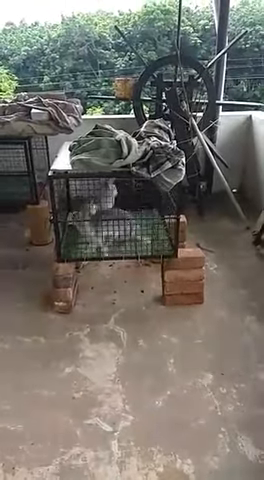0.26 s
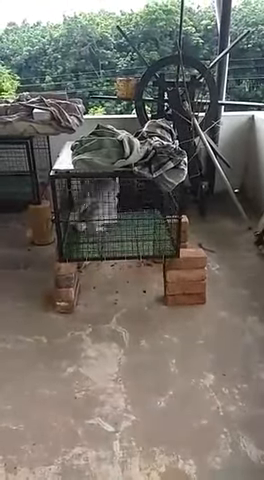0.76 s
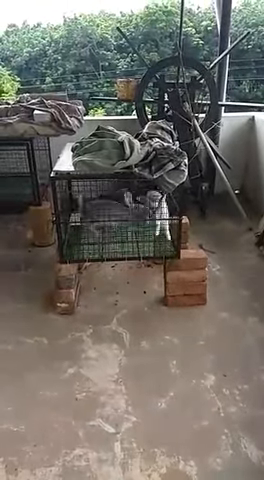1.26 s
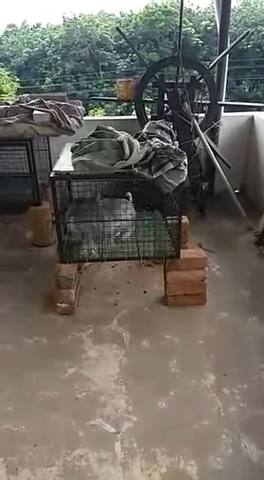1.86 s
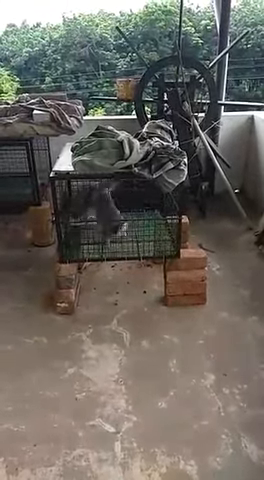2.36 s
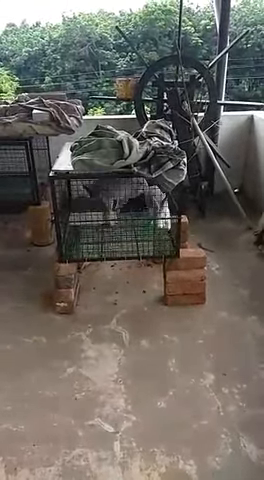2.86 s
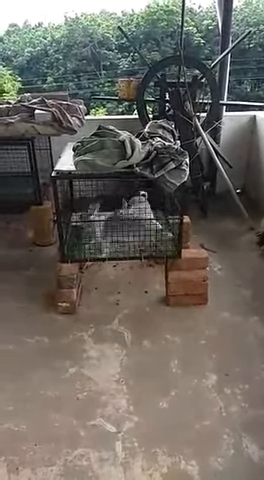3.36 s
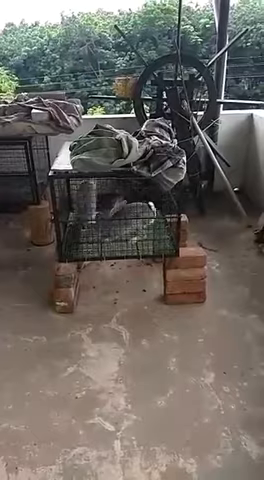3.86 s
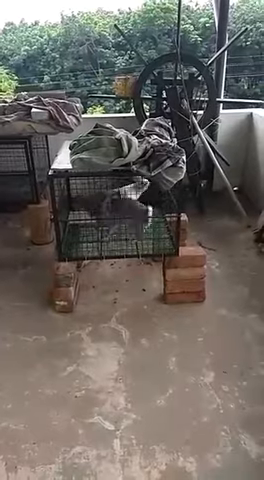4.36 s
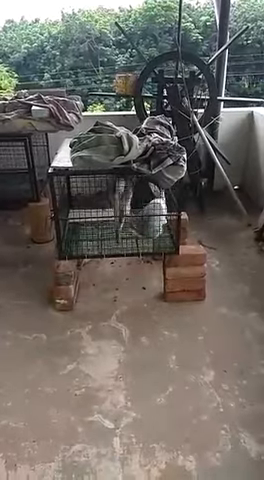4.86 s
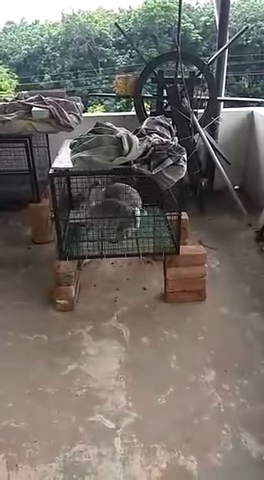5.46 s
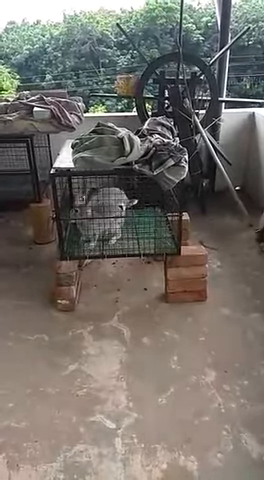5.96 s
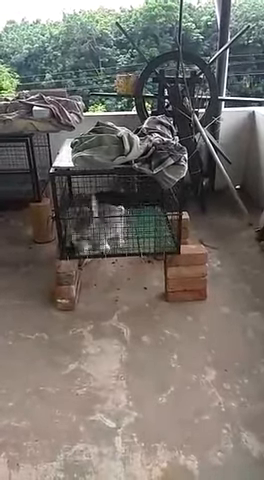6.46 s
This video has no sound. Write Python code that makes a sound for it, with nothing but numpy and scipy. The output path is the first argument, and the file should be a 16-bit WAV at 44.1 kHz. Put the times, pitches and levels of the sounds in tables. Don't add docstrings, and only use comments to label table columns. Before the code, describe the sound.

A covered concrete terrace, heard by a phone a few metres from a wire cage where two rabbits scuffle. A low distant engine drone, strongest at the start, recedes under steady airy outdoor hiss. Restless paws scrabble and jingle the thin mesh. Rattling builds from 0.7 s to a sharp ringing clank at 0.9 s with a low thud. Smaller rattles and tray bumps come at 1.1-1.6 s and around 2.0 s. Chatter resumes at 2.6 s, then the loudest crash hits at 2.75 s, bright rods ringing over a booming metal floor, rebounding at 3.0 s. Light rattles follow at 3.3 and 3.6 s, then a lull, a soft clatter at 4.0 and 4.4 s, and a cluster of clanks at 4.5-4.8 s. Thin wire ticks and short rattles continue to 5.2 s. It is nearly quiet until 6.2 s, when light rattling returns to the end, 6.7 s. Echoes are short and hard.

```python
import sys
import numpy as np
from scipy import signal
from scipy.fft import rfft, irfft, next_fast_len
from scipy.io import wavfile
from scipy.ndimage import uniform_filter1d

SR = 44100
rng = np.random.default_rng(int(sys.argv[2]) if len(sys.argv) > 2 else 0)


def store_wav(level_fs):
    pcm = np.round(np.clip(np.atleast_2d(level_fs), -1, 1) * 32767)
    wavfile.write(sys.argv[1], SR, pcm.T.astype(np.int16))


def boost(x):
    u = np.asarray(x, float) / 20
    return 10 ** u


N = 295468


def evened(x):
    return x / np.sqrt(np.mean(x ** 2) + 1e-20)


def db_of(power):
    return 10 * np.log10(np.abs(power) + 1e-20)


def read(points, hz):
    f, value = np.transpose(points)
    return np.interp(np.log(hz + 1), np.log(f + 1), value)


def curve(points):
    return np.interp(np.arange(N) / SR, *np.transpose(points))


# t/s, level/dB
PAW_EFFORT = [(0, -30), (.15, -31), (.6, -33), (.8, -36.5), (1.16, -31.5), (1.44, -36), (1.9, -35.5),
              (2.45, -32.5), (2.6, -41.5), (2.9, -25.5), (3.15, -34.5), (3.45, -50), (3.9, -42.5),
              (4.3, -46), (4.75, -37), (5.3, -51.5), (5.9, -47), (6.2, -48), (6.7, -48)]


def paw_effort():
    return curve(PAW_EFFORT)


def effort_swing():
    effort = paw_effort()
    return effort - effort.mean()


# t/s, level/dB
ENGINE_NEARNESS = [(0, -35), (.3, -38.5), (.6, -44.5), (1.3, -45.5), (2.0, -42), (3.0, -46.5), (4.0, -48),
                   (5.2, -47), (6.7, -50)]


def engine_nearness():
    return curve(ENGINE_NEARNESS)


# f/Hz, level/dB per Hz
AIR_COLOUR = [(15, -53), (25, 2), (96, -31), (147, -3), (244, -8.5), (278, -4.5), (353, -5.5), (599, -13.5),
              (684, -10), (2310, -14), (8930, -13), (11500, -19), (13000, -21), (14000, -50)]
# f/Hz, likeness (1 = the same)
AIR_LIKENESS = [(30, 0.99), (70, 0.75), (280, 0.87), (700, 0.3), (1500, 0.035), (4000, 0.017),
                (13000, 0.053)]


def wash():
    frames, hz = N // 256 + 5, np.fft.rfftfreq(1024, 1 / SR)
    a, b, c, d, patches = rng.standard_normal((frames, 513, 5)).T
    patches = evened(uniform_filter1d(uniform_filter1d(patches, 10, 0), 6, 1))
    gusts = evened(patches[60:].mean(0)) * (hz > 2000)[:, None]
    same = np.clip(read(AIR_LIKENESS, hz), -1, 1)[:, None]
    left = a + 1j * b
    right = same * left + np.sqrt(1 - same ** 2) * (c + 1j * d)
    level_db = read(AIR_COLOUR, hz)[:, None] + 2.1 * patches + 2.12 * gusts
    spectra = np.array([left, right]) * boost(level_db)
    air = evened(signal.istft(spectra, nperseg=1024, noverlap=768)[1][:, :N])
    near = engine_nearness()
    loudness_db = -43.5 + 0.13 * effort_swing() + 0.13 * (near - near.mean())
    return boost(6.5 + loudness_db) * air


# t/s, f/Hz of its cycle
ENGINE_SPEED = [(0, 20.7), (1.5, 20.1), (3, 19.7), (5, 19.3), (6.7, 19.2)]
# multiple of the cycle, level/dB
ENGINE_TONES = [(5, -18), (6, -13), (7, 0.5), (8, 0), (9, -21), (10, -4.5), (11, -8), (14, -11.5),
                (15, -26), (17, -16), (19, -10.5), (24, -19.5)]


def hum():
    turns = np.cumsum(curve(ENGINE_SPEED)) / SR
    now, steps = np.arange(N), np.linspace(0, N, 40)
    out = np.zeros(N)
    for order, db in ENGINE_TONES:
        swell_db, slip = rng.standard_normal((2, len(steps)))
        drift = np.interp(now, steps, 0.067 * np.cumsum(slip))
        phase = round(order) * turns + drift
        out += boost(db + np.interp(now, steps, 2.9 * swell_db)) * np.sin(2 * np.pi * phase)
    loudness = uniform_filter1d(boost(2 + engine_nearness()), size=9000)
    return boost(-2.0) * loudness * evened(out)


# f/Hz, time to fall 60 dB t/s
TERRACE_ECHO = [(200, 0.1), (1000, 0.22), (4000, 0.25), (12000, 0.23)]


def terrace(x):
    taps = np.zeros((2, SR))
    at = np.arange(200, SR - 20, 20) + rng.integers(0, 20, (2, (SR - 201) // 20))
    np.put_along_axis(taps, at, rng.choice([-1., 1.], at.shape), 1)
    hz, t, z = signal.stft(taps, SR, nperseg=256)
    fade = boost(-60 * t / read(TERRACE_ECHO, hz)[:, None])
    tail = signal.istft(z * fade, SR, nperseg=256)[1]
    return signal.fftconvolve(x, tail / np.linalg.norm(tail[0]), axes=1)[:, :N]


# t/s, level/dB, f/Hz
CAGE_THUDS = [(.9, -29.5, 155), (1.49, -33.5, 170), (2.76, -29.5, 165.7), (2.92, -31, 149.6),
              (2.93, -33.5, 273), (4.1, -37, 386), (4.721, -32.5, 140.7), (4.73, -37.5, 275),
              (6.5, -37.5, 170.7), (4.25, -40.5, 385), (6.3, -40, 384), (6.45, -41, 380)]


def thuds():
    rise_s, t60_s, spread = 0.048, 0.42, 0.06
    out, t = np.zeros(N + SR), np.arange(SR // 2) / SR
    chance = rng.standard_normal((len(CAGE_THUDS), 2, 6, 1))
    for (s, db, hz), (off, phase) in zip(CAGE_THUDS, chance):
        modes = evened(np.sin(2 * np.pi * (hz * (1 + spread * off) * t + phase)).sum(0))
        fade = boost(db - 60 * t / t60_s) * np.minimum(t / rise_s, 1)
        out[round(s * SR):][:len(t)] += fade * modes
    return out[:N]


def ring(modes, longest):
    hz, db, t60 = np.transpose(modes)[:, :, None]
    t = np.arange(round(longest * SR)) / SR
    fade = boost(db - 60 * t / np.clip(t60, .01, longest))
    body = (fade * np.sin(2 * np.pi * hz * t)).sum(0)
    return body / np.linalg.norm(body)


def contacts(per_s, spread_db):
    size = boost(spread_db * np.minimum(rng.exponential(1, N), 4)) * rng.choice([-1, 1], N)
    return evened(size * (rng.random(N) < per_s / SR))


def shaking(kicks, rise_s):
    out, t = np.zeros((2, N + SR)), np.arange(SR // 4) / SR
    for s, db, pan_db, length in kicks:
        fade = np.exp(-t / max(length, .002)) * np.minimum(t / rise_s, 1)
        sides = boost(db + pan_db * np.array([[.5], [-.5]]))
        out[:, round(s * SR):][:, :len(t)] += (sides * fade) ** 2
    return np.sqrt(out[:, :N])


# t/s, level/dB
FOOT_LANDINGS = [(.455, -32), (.848, -25), (.8994, -33), (1.315, -27), (1.496, -21.5), (2.063, -24.5),
                 (2.7006, -39), (2.757, -12.5), (2.826, -28), (2.914, -22.5), (3.011, -35), (3.054, -24),
                 (3.2859, -33), (4.7176, -23), (4.825, -27), (5.178, -32), (5.59, -40), (6.283, -24.5),
                 (6.54, -34)]
# f/Hz, level/dB, time to fall 60 dB t/s
TRAY_MODES = [(200, -46, .12), (273, -49, .12), (326.5, 0.5, 0.26), (624, -12, 0.43), (800, -20, 0.074),
              (1018, 1, 0.17), (1220, -14, 0.52), (1795, 15, 0.023)]


def tray():
    landings = [(s, db, 0, 0.017) for s, db in FOOT_LANDINGS]
    drive = boost(-10.5) * shaking(landings, rise_s=.003).mean(0) * contacts(1600, 1.4)
    return signal.oaconvolve(drive, ring(TRAY_MODES, 0.44))[:N]


# t/s, mesh level/dB, left-right level/dB, chatter length t/s
PAW_RAKES = [(0.172, -33, -14, 0.014), (0.8, -15, 2, 0.03), (0.843, -21.5, -10, 0.014),
             (1.138, -25, 6, 0.017), (1.312, -23.5, -2, 0.011), (1.413, -29, 9, .019),
             (1.546, -30.5, -7, 0.022), (1.644, -43, 0, .025), (1.994, -28, -5, 0.05), (2.28, -44, 0, .027),
             (2.644, -23.5, -1.5, 0.058), (2.856, -26, -1, .04), (2.968, -24, 12, 0.017),
             (3.093, -34, -3, 0.036), (3.281, -23.5, 0.5, 0.022), (3.37, -33, 3, 0.03),
             (3.564, -25, 2, 0.015), (3.627, -29.5, 1, 0.031), (4.452, -33, -1, 0.01),
             (4.534, -26.5, 2.5, 0.044), (4.82, -22.5, 1, 0.013), (4.932, -34.5, 12, 0.023),
             (4.96, -39, 7, .028), (4.991, -26.5, 1, 0.011), (5.08, -33, -1, 0.029),
             (5.182, -25.5, 1, 0.013), (6.234, -25.5, 2.5, 0.023), (6.282, -25, -1, 0.012),
             (6.429, -33, 3.5, 0.028), (6.478, -28, -1.5, 0.053), (6.662, -28, 2, 0.046)]


def rakes(frame_db=0):
    return [(s, db + frame_db, pan, length) for s, db, pan, length in PAW_RAKES]


# t/s, mesh level/dB, frame over mesh level/dB, left-right level/dB
BODY_SLAMS = [(.455, -40, -12, -11), (.721, -29, -11, 8), (.838, -22.5, -4, -2), (.878, -30, 5, 0),
              (0.888, -21, 0.5, 13), (0.895, -12, -12, -1), (0.931, -21, 1.5, -1), (0.955, -22.5, 4, -1),
              (.975, -24, 2, 1), (.992, -25.5, 1, 3), (1.096, -30, 1, 2), (1.497, -25.5, -5.5, 8.5),
              (1.972, -20, -4.5, 1), (2.063, -38.5, 11, -1), (2.445, -51.5, 1, -5),
              (2.598, -22.5, -6, -0.5), (2.616, -20.5, -14, -0.5), (2.6989, -20, 2, 0.5),
              (2.7479, -7, 1.5, -6.5), (2.765, -23, 4, 1), (2.815, -14.5, 1.5, 2), (2.914, -17.5, -8, -2),
              (3.008, -16, -6, 3), (3.053, -24.5, 0, 1), (3.976, -29, -3, -1), (3.988, -22.5, -5, 0),
              (4.379, -26.5, -5.5, 1), (4.398, -31, -2.5, -2), (4.733, -27.5, -5, -8),
              (4.581, -26.5, -11, -2), (4.639, -19.5, -8, 0.5), (4.718, -19, -5, 2.5),
              (6.246, -32, -10, -1), (6.607, -29.5, -20, 5)]


def slams(on_frame):
    return [(s, db + on_frame * frame_db, pan, 0.016 * boost(-0.1329 * (db + 34.5)))
            for s, db, frame_db, pan in BODY_SLAMS]


def wires(colour, t60, count):
    hz = rng.uniform(1475, 13500, count)
    db = read(colour, hz) + 4 * rng.standard_normal(count)
    return ring(np.c_[hz, db, t60 * rng.uniform(.5, 1.5, count)], .1)


# f/Hz, level/dB
FREE_MESH = [(880, -37), (1500, -22), (1900, 0), (2500, 6.5), (2970, 2.5), (3540, -10), (4080, -10),
             (4440, 1.5), (12500, 12.5), (13400, 6.5), (14000, -57)]
# f/Hz, level/dB
BRACED_MESH = [(880, -37), (1500, -22), (2000, -15), (2900, 2), (3200, -24), (3550, 10.5), (4000, -25),
               (4400, 1), (6700, 3), (7100, -17), (7900, 10.5), (10000, 8), (11500, 3), (13400, 4),
               (14000, -57)]


def mesh():
    raking = boost(-3.0) * shaking(rakes(), rise_s=.006) * contacts(2500, 4.1)
    scrabble = boost(-8.5) * boost(-2 + paw_effort()) * contacts(3000, 8.5)
    light = raking + scrabble
    heavy = boost(-3.0) * shaking(slams(on_frame=False), rise_s=.003) * contacts(2500, 4.1)
    place = np.cumsum(np.abs(uniform_filter1d(rng.standard_normal(N), 2000))) * 400 / SR
    patch = place.astype(int) % 4
    out = np.zeros((2, N))
    for k in range(4):
        for drive, colour, t60 in ((light, FREE_MESH, .035), (heavy, BRACED_MESH, .05)):
            patch_ring = wires(colour, t60, count=240)[None]
            out += signal.oaconvolve(drive * (patch == k), patch_ring, axes=1)[:, :N]
    return out


THICK_ROD_HZ = [1245, 1779, 2327, 2592, 2676, 2925, 2986, 3460, 3574, 4357, 4391, 4735, 5500, 1980]
THIN_ROD_HZ = [6029, 6183, 6432, 6730, 7849, 8146, 8473, 8683, 9215, 9690, 9943, 10800, 11180, 11540]
# time to fall 60 dB t/s, then level/dB in
RODS = [(0.24, -11, -31, -31, -42), (.12, -14, -31, -33, -40), (0.18, 2.5, -26, -33, -38),
        (0.14, 2, -33, -32, -40), (0.13, 5, -31, -26, -35), (0.16, 1, -30, -26, -38),
        (.15, -1, -31, -32, -40), (0.065, -12, -46, -38, -48), (0.14, 2, -29, -20, -24.5),
        (0.2, 3.5, -23.5, -31, -41), (0.17, -1, -32, -34, -36), (0.1, -0.5, -30, -24, -27),
        (0.13, 2.5, -33, -20.5, -32), (.12, 1, -32, -36, -44),
        (.12, -3, -36, -32, -33), (.1, -6, -30, -32, -42), (0.12, -7, -36, -28, -38),
             (.08, 2.5, -26, -32, -39), (0.18, 2, -37, -32, -35), (0.26, 2, -34, -27, -38),
             (0.16, 6.5, -36, -30, -38), (0.11, 2, -36, -27, -40), (.16, 0.5, -32, -26, -34),
             (.15, -7, -34, -32, -38), (0.16, -3, -38, -34, -35), (.15, -4, -35, -21, -40),
             (0.11, -6, -38, -25, -40), (0.087, -6, -36, -27, -40)]


def rod_ring(column, longest):
    table = np.array(RODS)
    db = table[:, column]
    return ring(np.c_[THICK_ROD_HZ + THIN_ROD_HZ, db, table[:, 0]], longest), db


def frame():
    hz = rng.uniform(1787, 7118, 90)
    welds = ring(np.c_[hz, 4 * rng.standard_normal(90), np.full(90, .04)], 1 / 4)
    rods, _ = rod_ring(column=1, longest=1 / 4)
    kicks = slams(on_frame=True) + rakes(frame_db=-17)
    clank = boost(-5) * shaking(kicks, rise_s=.003) * contacts(1800, 0.79)
    stirring = boost(-42 + 1.02 * effort_swing())
    jingle = boost(-6.5) * stirring * contacts(2500, 5.3)
    clank = signal.oaconvolve(clank, (rods + welds)[None], axes=1)[:, :N]
    return clank + signal.oaconvolve(jingle, welds + boost(-18.5) * rods)[:N]


# t/s,
# level/dB, f/Hz
BRIEF_TICKS = [(.19, -28, 10900), (.905, -6, 5500), (.912, -11.5, 4500), (.914, -13, 5500),
               (.806, -14, 11500), (.894, -5, 2610), (.899, -3, 2890), (.9, -6, 5500), (.907, -11, 2630),
               (.9, -10, 9800), (1.327, -14, 9600), (1.546, -15, 10800), (1.655, -19, 12000),
               (3.575, -20, 10700), (2.7495, -1, 8940), (2.757, -3, 9500), (2.762, 0, 8560),
               (2.772, -9, 7450), (2.778, -3.5, 5000), (3.012, -11, 5330), (3.02, -14, 9500),
               (4.379, -14, 8750), (4.519, -17, 11260), (4.588, -19, 11700), (4.689, -15, 11500),
               (4.7195, -19, 9320), (4.7195, -13, 12700), (4.726, -19, 12200), (4.729, -23, 9100),
               (4.7345, -20, 10200), (4.964, -8, 10600), (5.002, -16, 10830), (5.086, -17, 12000),
               (5.187, -13.5, 11260), (5.198, -13, 11400), (5.6, -31, 11000), (5.87, -33, 10600),
               (6.24, -26, 10200), (6.44, -28, 10000), (6.256, -16, 11600), (6.285, -15, 11340),
               (6.497, -32, 11100), (6.546, -26, 11500), (6.62, -18, 12000), (2.746, -11, 7300),
               (2.7495, -6, 5500), (2.753, -4, 3550), (2.767, -2, 9280), (2.812, -9, 8000),
               (2.824, -11, 8030), (2.833, -11, 8170), (3.011, -15, 9600), (3.011, -17, 12500),
               (3.028, -16, 8000), (3.028, -20, 5500), (4.831, -16, 8600), (4.842, -22, 8850)]


def ticks():
    return [(s, db, hz, 0.02, .13) for s, db, hz in BRIEF_TICKS]


# t/s, level/dB, f/Hz, spread of close tones as a share
ROD_KNOCKS = [(.682, -29.5, 930, 0.021), (.834, -21, 341, 0.031), (0.93, -27, 986, 0.002),
              (1.2, -31, 344, 0.077), (1.49, -25.5, 738, 0.09), (2.716, -11, 5300, 0.069),
              (2.93, -23, 677, 0.083), (3.012, -10.5, 5500, 0.059), (3.012, -14.5, 2900, 0.106),
              (4.72, -18, 4600, .05), (4.724, -19, 2200, 0.053), (4.729, -21, 3400, .05),
              (4.734, -21, 4900, .08), (4.642, -18.5, 2900, .08), (4.645, -20, 5000, 0.027),
              (2.716, -11.5, 3570, 0.0093), (0.92, -26, 6200, .03), (0.75, -25.5, 4700, 0.038),
              (.808, -30, 2700, .04), (3.016, -10.5, 7600, .04), (3.018, -18, 2700, .02),
              (2.748, -8, 2700, 0.029), (2.746, -18, 9400, 0.027), (4.639, -15.5, 5750, 0.033),
              (.884, -13, 2500, 0.046), (.889, -11, 2750, .05), (.898, -12, 3550, .03),
              (4.73, -29, 950, 0.102), (3.012, -15, 3300, .02), (.96, -20, 2330, .02),
              (.985, -21, 3200, .02), (1.29, -27, 640, .08), (2.924, -21, 4700, .01),
              (3.03, -18, 3570, .008), (3.045, -20, 3570, .008), (4.672, -21, 6600, .02)]


def knocks():
    return [(s, db, hz, 0.09 * (hz / 1000) ** -0.6, spread) for s, db, hz, spread in ROD_KNOCKS]


# f/Hz, level/dB, time to fall 60 dB t/s, spread of close tones as a share
DOOR_MODES = [(5500, -9, 0.073, 0.008), (2926, -11, 0.13, 0.0193), (3570, -12, 0.066, 0.0078),
              (2457, -9, 0.055, 0.05), (4714, -14.5, 0.19, 0.006), (989, -19.5, 0.28, 0.0033),
              (1238, -25, .25, 0.0096)]
# f/Hz, level/dB, time to fall 60 dB t/s, spread of close tones as a share
WALL_MODES = [(9160, -5.5, 0.086, .008), (5500, -11, 0.047, 0.018), (8310, -5.5, 0.12, 0.076),
              (348, -13, 0.16, 0.03), (982, -16.5, 0.24, 0.003), (2263, -12, 0.11, 0.019),
              (2820, -17, 0.18, 0.033), (3550, -10.5, 0.088, 0.0051), (1792, -31, .13, .008),
              (1258, -17.5, 0.23, 0.0156), (4740, -21, 0.27, 0.009)]


def great_clanks():
    return [(s + min(9 / hz, 0.0118), db, hz, t60, spread)
            for s, part in ((.893, DOOR_MODES), (2.749, WALL_MODES)) for hz, db, t60, spread in part]


def pings():
    strikes = great_clanks() + knocks() + ticks()
    out, left = np.zeros((2, N + SR)), np.array([1, 0])[:, None, None]
    chance = rng.standard_normal((len(strikes), 3, 12, 1))
    for (s, db, hz, t60, spread), (off, phase, apart) in zip(strikes, chance):
        length = min(t60, 1 / 3)
        t = np.arange(0, length, 1 / SR)
        turns = hz * (1 + spread * off) * t + 2 * phase + left * 0.2 * apart
        modes = np.sin(2 * np.pi * turns).sum(1)
        fade = boost(-60 * t / length) * np.minimum(t / (0.00065 + 1.75 / hz), 1)
        sound = np.sqrt(np.mean(fade ** 2)) * evened(fade * modes)
        out[:, round(s * SR):][:, :len(t)] += boost(db - 3) * sound
    return out[:, :N]


# t/s, bouncing length t/s
GREAT_BLOWS = [
    (.894, 0.01),
    (2.749, .012),
    (3.010, 0.013),
]


def clangs():
    out, t = np.zeros(N + SR), np.arange(SR // 10) / SR
    for k, (s, length) in enumerate(GREAT_BLOWS):
        rods, db = rod_ring(column=2 + k, longest=.3)
        blow = rng.standard_normal(len(t)) ** 3 * np.exp(-t / length) * np.minimum(t / 0.0033, 1)
        sound = signal.fftconvolve(blow / np.linalg.norm(blow), rods)
        out[round(s * SR):][:len(sound)] += boost(28.0) * np.linalg.norm(boost(db)) * sound
    return out[:N]


def scene():
    strikes = pings() + clangs()
    cage = mesh() + frame() + tray()
    direct = cage + strikes
    direct = np.array([np.roll(direct[0], 8), direct[1]])
    echo = terrace(boost(0.5) * cage + boost(-7.0) * strikes)
    side = (echo[0] - echo[1]) / 2
    bass_side = signal.sosfiltfilt(signal.butter(1, 450, fs=SR, output="sos"), side)
    echo = echo - bass_side * np.array([[1], [-1]])
    return boost(-4.0) * direct + echo + wash() + hum() + thuds()


# f/Hz, level/dB
FAINT_LIMIT = [(700, -22), (1100, -12), (1500, -8), (2200, -5.5), (3400, -4), (5000, -4.5), (9000, -5),
               (11500, -8.5), (12900, -9), (13120, 30)]


def thinned(x):
    size, start = 1024, 340
    n, k = np.arange(2 * size)[:, None] + .5, np.arange(size) + .5
    window = np.sin(np.pi * n / (2 * size))
    basis = window * np.cos(np.pi / size * (n + size / 2) * k) * np.sqrt(2 / size)
    padded = np.pad(x, ((0, 0), (2 * size - start, 3 * size)))
    count = padded.shape[1] // size
    halves = padded[:, :count * size].reshape(2, count, size)
    lines = np.concatenate([halves[:, :-1], halves[:, 1:]], 2) @ basis
    power = (lines ** 2).sum(0)
    over_db = db_of(uniform_filter1d(power, size=6)) - db_of(uniform_filter1d(power, size=50))
    wander = uniform_filter1d(rng.standard_normal(power.shape), size=13)
    wander = evened(uniform_filter1d(wander, size=3, axis=0))
    limit_db = read(FAINT_LIMIT, k * SR / (2 * size)) + 0.9 + 5.5 * wander
    calm = np.diff(db_of(power[:, 100:].sum(1)), prepend=0) < 5.0
    dropped = (over_db < limit_db) & calm[:, None]
    frames = (lines * ~dropped) @ basis.T
    joined = frames[:, 1:, :size] + frames[:, :-1, size:]
    return joined.reshape(2, -1)[:, size - start:][:, :N]


# strike t/s, gap length t/s, depth level/dB, lower edge f/Hz
TREBLE_GAPS = [(.805, .013, -12, 3500), (1.542, .025, -8, 2800), (1.656, .009, -8, 2800),
               (2.745, .008, -40, 4600), (2.749, .004, -30, 9000), (4.517, .013, -40, 2800),
               (4.963, .012, -18, 2800), (5.088, .005, -8, 2800), (6.439, .012, -9, 2800)]
# from t/s, to t/s
THIN_MOMENTS = [(.788, .812), (1.52, 1.55), (2.735, 2.758), (3.005, 3.03), (4.37, 4.395), (4.5, 4.525),
                (4.715, 4.74), (4.95, 4.975), (5.075, 5.1), (5.18, 5.205), (6.425, 6.45)]


def muted(x):
    hz, t, z = signal.stft(x, SR, nperseg=128, noverlap=96)
    change_db = sum(db * (t > s - length) * (t < s) * (hz[:, None] > edge)
                    for s, length, db, edge in TREBLE_GAPS)
    power = uniform_filter1d(uniform_filter1d(np.abs(z) ** 2, size=3, axis=1), size=4, axis=2)
    weak = db_of(power) - db_of(uniform_filter1d(power, size=15, axis=1)) < -2.5
    thin = sum((t > s) * (t < end) for s, end in THIN_MOMENTS) * (hz[:, None] > 2000)
    change_db = change_db - 25.0 * weak * thin
    return signal.istft(z * boost(change_db), SR, nperseg=128, noverlap=96)[1][:, :N]


def low_pass(x):
    return signal.sosfilt(signal.butter(12, 14310, fs=SR, output="sos"), x)


# f/Hz, left-right level/dB
MICROPHONE_LEAN = [(600, 0), (1100, 0.5), (2200, -0.5), (5500, 0), (9000, 1), (13500, 11)]


def record(dry):
    size = next_fast_len(N, real=True)
    hz = np.fft.rfftfreq(size, 1 / SR)
    lean_db = read(MICROPHONE_LEAN, hz) * np.array([[.5], [-.5]])
    x = np.tanh(irfft(rfft(dry, size) * boost(lean_db), size)[:, :N])
    x = muted(thinned(x))
    bass_db = -8 * np.log2(np.maximum(90 / (hz + 1), 1))
    edge_db = -50 * np.clip((hz - 13100) / 900, 0, 1.5) - 15 * np.clip((hz - 13050) / 150, 0, 1)
    mix = irfft(rfft(x, size) * boost(bass_db + edge_db), size)[:, :N]
    return low_pass(mix)


dry = scene()
out = record(dry)
store_wav(out)
```